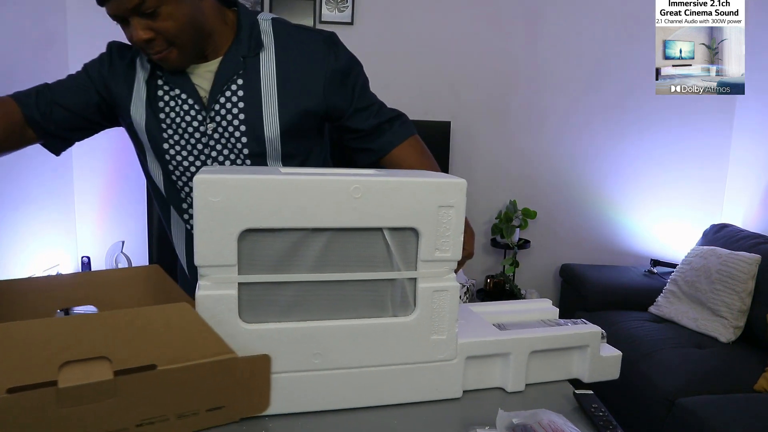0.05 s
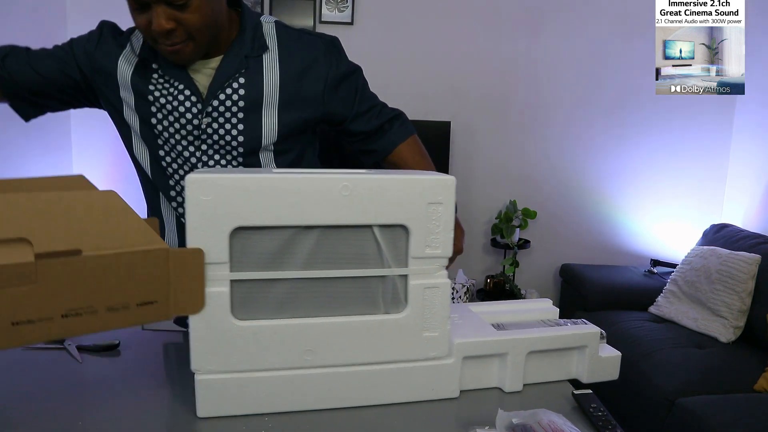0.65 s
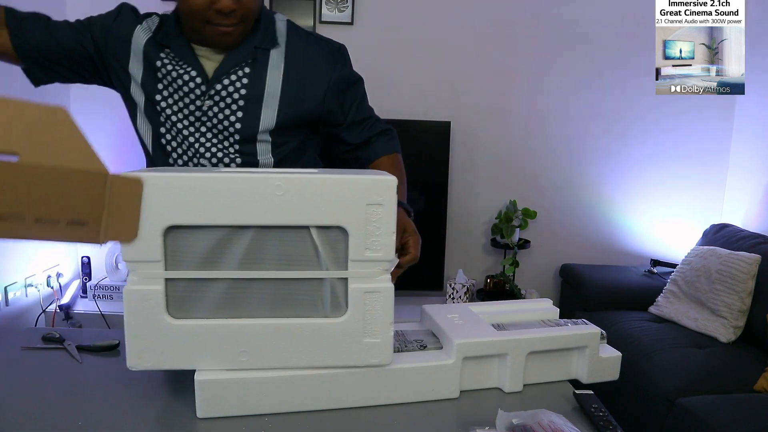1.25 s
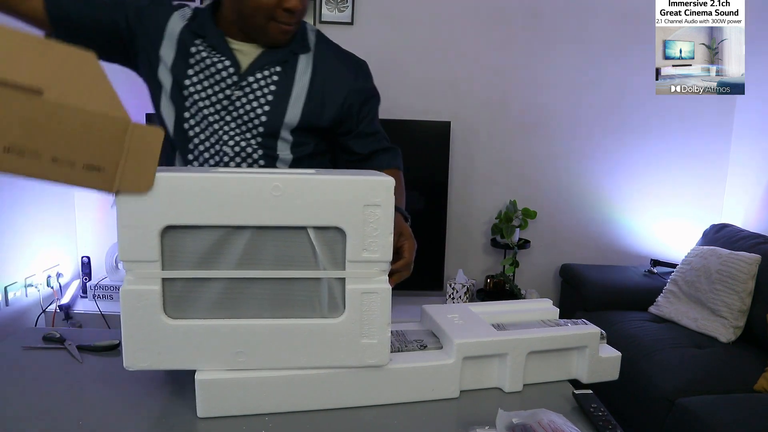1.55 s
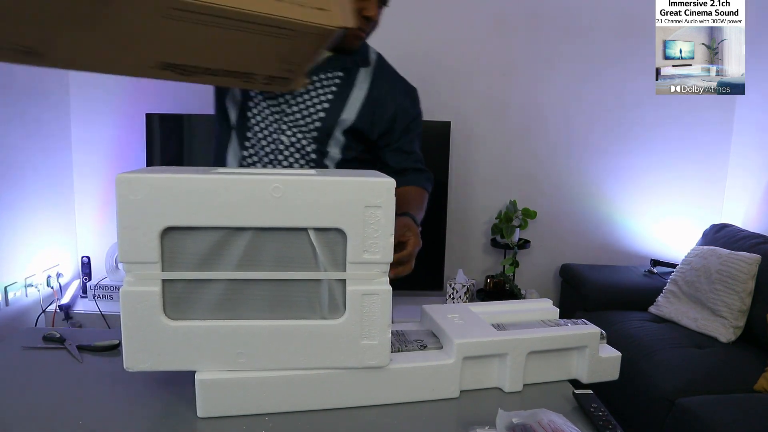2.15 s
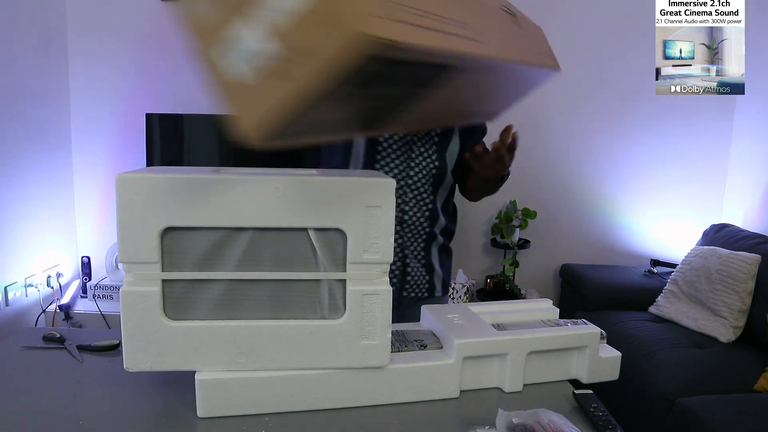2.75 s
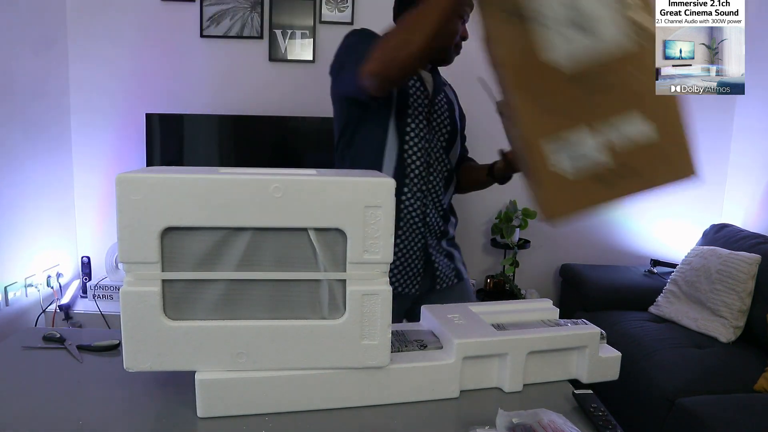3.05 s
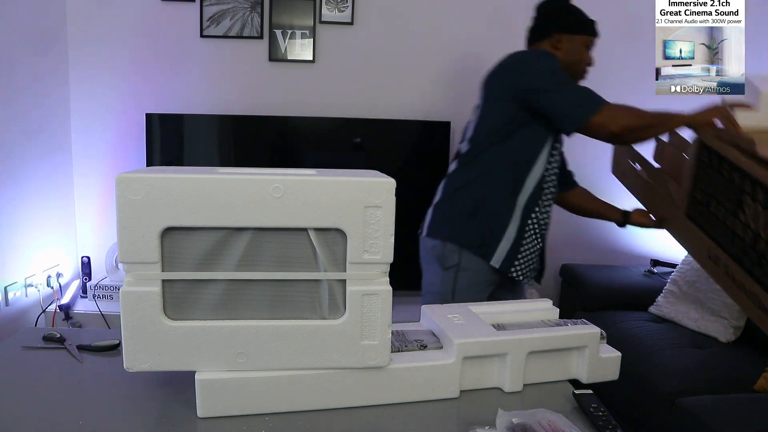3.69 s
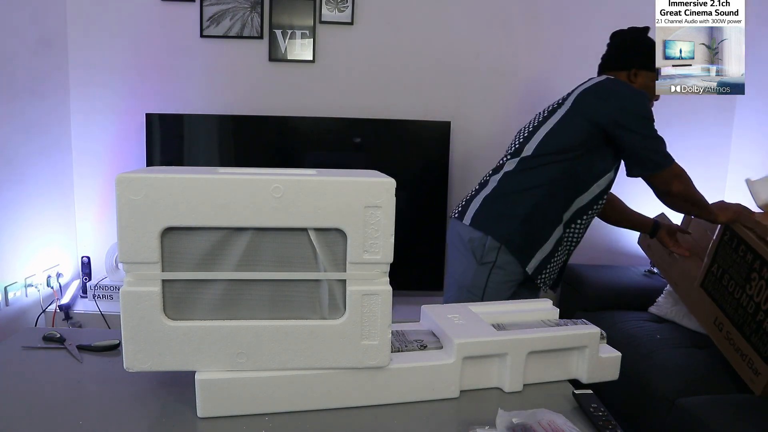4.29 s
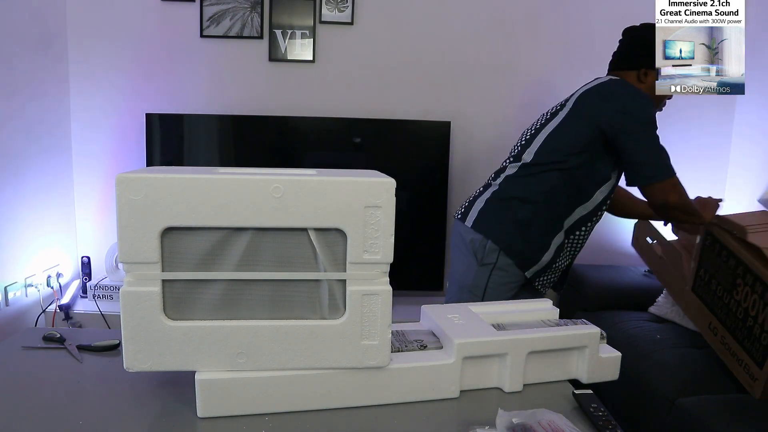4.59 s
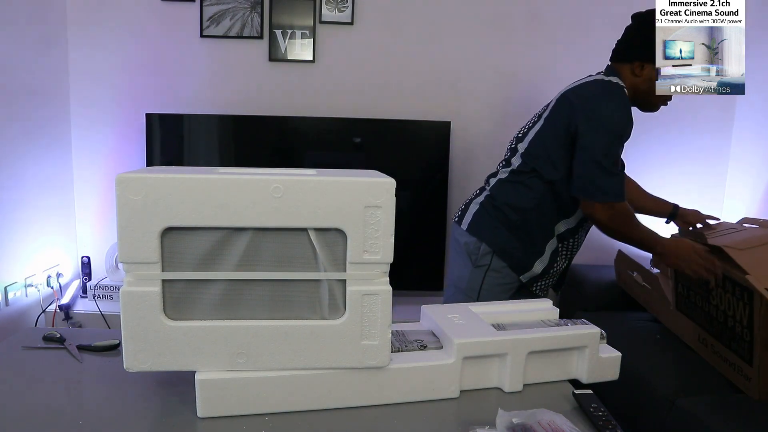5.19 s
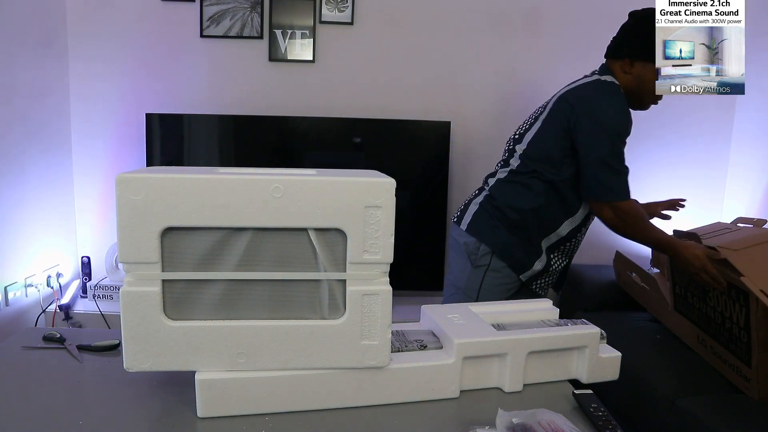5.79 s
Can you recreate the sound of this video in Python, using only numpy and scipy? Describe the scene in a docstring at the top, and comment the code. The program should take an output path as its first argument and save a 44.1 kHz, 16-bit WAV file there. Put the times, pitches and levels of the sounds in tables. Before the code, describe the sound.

A hollow cardboard carton scrapes and squawks over foam, then thuds and clacks as it is carried and set down in a small room.

```python
"""In a small room, a big cardboard carton is dragged off foam blocks, swung overhead and dropped on a sofa.
The card rasps over the foam, and sticks and slips to make a squawk and a low drone.
Blows make the hollow carton thud and boom, its flaps clack and scuff, and creases crack.
Some blows set a stiff panel ringing. Hands and sleeves rustle as it travels from left to right."""
import sys
import numpy as np
from scipy import signal
from scipy.fft import rfft, irfft, next_fast_len
from scipy.io import wavfile
from scipy.ndimage import uniform_filter1d

SR = 44100
rng = np.random.default_rng(int(sys.argv[2]) if len(sys.argv) > 2 else 0)


def master_out(mix):
    """Clip the mix to full scale and print it as 16-bit PCM to the path in sys.argv[1]."""
    frames = np.transpose(np.atleast_2d(mix))
    ceiling = np.clip(frames, -1, 1)
    pcm = np.round(ceiling * 32767).astype(np.int16)
    wavfile.write(sys.argv[1], SR, pcm)


N = 261954
FFT_SIZE = next_fast_len(N + SR // 5)
TIME, FREQS = np.arange(N) / SR, np.fft.rfftfreq(FFT_SIZE, 1 / SR)
EVENT_TIME = np.arange(SR // 2) / SR  # the half second that one short sound gets

# Blows on the carton. Each row: start in seconds, thud level in dB, pitch in Hz, clack level in dB,
# fade time in seconds, then dent and air boom in dB added to the thud level.
# A fade time (t60) is how long a sound takes to drop 60 dB. Table levels are relative: the code trims them.
BLOWS = [(0.076, -26.5, 607, -32, 0.17, 0, -33), (0.26, -27, 248, -41, 0.16, -4, -39),
         (0.357, -23, 241, -34, 0.18, 1, -37), (0.399, -16.5, 306, -15, 0.16, -3, -28.5),
         (0.498, -30.5, 529, -29, 0.16, -6, -31), (0.553, -23.5, 385, -29, 0.18, 3, -31),
         (0.629, -39, 467, -29.5, 0.14, -13, -32), (0.797, -31, 443, -31, 0.44, -4, -28),
         (1.21, -30, 296, -24, 0.11, -13, -13), (1.403, -30, 260, -32, 0.17, -2, -20),
         (1.427, -23.5, 780, -20, 0.15, -22, -19), (2.045, -24, 176, -45, 0.42, -1, -22),
         (2.367, -23, 380, -20.5, 0.27, -3, -35), (2.91, -15, 217, -22.5, 0.47, -4.5, -24),
         (3.279, -32.5, 400, -39, 0.18, -1, -11.5), (3.412, -31, 294, -39.5, 0.55, -4, -16.5),
         (3.55, -30.5, 318, -38.5, 0.68, 0, -25), (3.805, -10.5, 288, -17, 0.61, 2.5, -20),
         (3.928, -10.5, 423, -21, 0.31, 5, -7.5), (3.947, -16.5, 256, -22.5, 0.41, 6, -32),
         (3.984, -20, 480, -21, 0.091, 2, -17), (4.002, -22, 300, -17.5, 0.34, 10, -32),
         (4.205, -31, 337, -49, 0.32, -14, -17), (4.377, -23, 285, -19, 0.46, 3.5, -17.5),
         (4.509, -31.5, 465, -46, 0.35, -1, -13.5), (4.625, -40, 122, -42.5, 0.26, -15, -1.5),
         (4.821, -26, 253, -48, 1, 1.5, -10.5), (4.875, -24, 785, -20.5, 0.15, -3, -28),
         (4.893, -10.5, 334, -23, 0.36, 5.5, -34), (4.912, -12, 345, -40, 0.082, -3, -4),
         (5.443, -32.5, 350, -42, 0.29, -14, -14)]
def blows():
    """Each blow dents a wall, booms the air inside and rings the walls. Returns tones and noises."""
    tones = np.zeros(N)
    for start, db, hz, _, t60, dent_db, boom_db in BLOWS:
        dent = ring([(hz, db + dent_db, 0.047 * t60)], rise=0.0075)
        boom = amp(db + boom_db) * air_boom(t60)
        add(tones, start, dent + boom + amp(db - 5) * walls(hz, t60))
    return tones + stiff_panel() + hollow_side(), flap_clacks() + thuds() + cracks()


# The notes of the carton's broad walls. Each row: pitch in Hz, level in dB.
WALL_NOTES = [(151, 10), (172, 6.5), (202, 7), (247, -0.5), (285, 3.5), (315, 0), (347, 1.5), (388, -5),
              (467, -6), (545, 1.5), (610, -14), (745, -19), (842, 12)]
def walls(pitch_hz, t60):
    """A blow rings the wall notes nearest its own pitch, each in a phase set by where it lands."""
    hz, db = np.transpose(WALL_NOTES)
    strength = amp(db - 20 * np.log2(hz / pitch_hz) ** 2)
    waves = np.sin(2 * np.pi * (hz[:, None] * EVENT_TIME + rng.random((len(hz), 1))))
    return burst(0.0023, t60) * (strength / np.linalg.norm(strength) @ waves)


# The notes of the air in the carton. Each row: pitch in Hz, level in dB.
AIR_NOTES = [(94.3, 6), (74.8, -8.5), (118.2, 0.5)]
def air_boom(t60):
    """The air inside booms, damped as much as the walls by what they rest on."""
    return ring([(hz, db, t60) for hz, db in AIR_NOTES], rise=0.016)


# The tone of a thud. Each row: frequency in Hz, level in dB.
THUD_TONE = [(60, -42), (130, -30), (200, 7), (320, 5.5), (480, 0.5), (700, -9), (1200, -34), (3000, -64)]
def thuds():
    """The contents thud at each blow: a burst of dull noise."""
    level = np.zeros(N)
    for start, db, _, _, t60, _, _ in BLOWS:
        add(level, start, amp(db - 14) * burst(0.0046, t60))
    return level * band(rng.standard_normal(N), amp(look_up(THUD_TONE, FREQS)))


# The tone of a clack. Each row: frequency in Hz, level in dB.
CLACK_TONE = [(240, -41), (400, 17), (550, 9), (690, 5), (949, -6.5), (1070, -1), (1740, -10),
              (2290, -11.5), (3190, -17), (10300, -34), (15000, -61)]
def flap_clacks():
    """Loose flaps clack at each blow and die away sooner than the walls, with a faint high tick."""
    clack, tick = np.zeros((2, N))
    rise = 0.0021
    for start, _, _, db, t60, _, _ in BLOWS:
        add(clack, start, amp(db - 4) * (burst(rise, 0.52 * t60) + 0.58 * burst(rise, 0.0067)))
        add(tick, start, amp(0.31 * db - 41) * burst(rise, 0.11))
    chatter = slips(per_s=25000, spread_db=0.98)
    card = amp(look_up(CLACK_TONE, FREQS) + 2 * ripple(spacing_hz=44.4))
    return clack * band(chatter, card * above(750) * below(3300)) + tick * band(chatter, card * above(2640))


def ripple(spacing_hz):
    """The card's many small resonances: random ups and downs over frequency, broader in the treble."""
    place = np.log1p(FREQS / 2000) * 2000 / spacing_hz
    return unit(np.interp(place, np.arange(2048), rng.standard_normal(2048)))


# The notes of a stiff panel. Each row: pitch in Hz, level in dB, fade time in seconds.
PANEL_NOTES = [(666, 4, 0.21), (690, -2, 0.082), (847, -2.5, 0.13), (985, -11, 0.27), (1045, -9.5, 0.28),
               (380, -11, 0.2), (1640, -17, 0.12), (2650, -15, 0.13)]
# The blows that ring it. Each row: start in seconds, level in dB.
PANEL_HITS = [(4.003, -12), (4.892, -25)]
def stiff_panel():
    """A stiff panel swells into a short ring."""
    return strike(PANEL_NOTES, PANEL_HITS, rise=0.014)


# The notes of a hollow side. Each row: pitch in Hz, level in dB, fade time in seconds.
HOLLOW_NOTES = [(323, -5, 0.12), (395, -6.5, 0.17), (603, -1, 0.16), (654, -6, 0.22), (724, 0, 0.081),
                (860, -1, 0.063), (1255, -13, 0.097), (1470, -9.5, 0.092)]
# The blows that ring it. Each row: start in seconds, level in dB.
HOLLOW_HITS = [(1.431, -29.5), (2.371, -19.5), (3.807, -30), (4.895, -22)]
def hollow_side():
    """A hollow side answers a quick blow with a sharp knock."""
    return strike(HOLLOW_NOTES, HOLLOW_HITS, rise=0.0018)


# Creases that crack. Each row: start in seconds, level in dB, centre in Hz, fade time in seconds.
CREASES = [(0.399, -35, 1400, 0.044), (0.5545, -22, 500, 0.014), (1.2095, -22, 1600, 0.015),
           (1.433, -22.5, 1400, 0.035), (1.658, -27, 2500, 0.025), (2.21, -44, 4500, 0.013),
           (2.368, -24, 2030, 0.026), (2.9085, -28, 1000, 0.035), (3.19, -41, 3770, 0.027),
           (3.4125, -37, 1500, 0.038), (3.5505, -38.5, 1500, 0.026), (3.808, -25.5, 3650, 0.022),
           (4.005, -16, 1470, 0.062), (4.224, -48, 5460, 0.016), (4.382, -38, 4520, 0.025),
           (4.758, -37, 1800, 0.066), (4.886, -32, 5080, 0.04), (4.897, -35, 5500, 0.033)]
def cracks():
    """A crease gives way under a blow or a finger: fibres break, from a dull pop to a bright snap."""
    out = np.zeros(N)
    for start, db, hz, t60 in CREASES:
        octaves_away = np.log2((FREQS + 1) / hz)
        tone = np.exp(-.5 * (octaves_away / 0.78) ** 2) * below(13000, order=16)
        fibres = band(rng.standard_normal(N), tone)[:len(EVENT_TIME)]
        add(out, start, amp(db) * burst(0.00043, t60) * fibres)
    return out


# The pull off the foam. Each row: time in seconds, rasp level in dB, hiss in dB added to the rasp.
PULL = [(0.0, -29.5, -6), (0.2, -27.5, -5), (0.239, -17.5, -14.5), (0.267, -24.5, -10), (0.289, -16, -11.5),
        (0.339, -18.5, -13), (0.385, -28.5, -3), (0.46, -38.5, -0.5), (0.53, -32.5, -10), (0.6, -36, -8.5),
        (0.77, -30.5, -8), (1.05, -30.5, -4.5), (1.17, -33, -8.5), (1.26, -31.5, -7), (1.32, -31.5, -6),
        (1.385, -32.5, -5.5), (1.425, -30, -4.5), (1.47, -30.5, -6.5), (1.73, -31.5, -4),
        (1.89, -47.5, -13), (2.021, -48.5, -15)]
# Where the carton binds. Each row: start and length in seconds, hollow body in dB added to the rasp.
SNAGS = [(0.0, 0.19, -2.5), (0.243, 0.058, -2.5), (0.399, 0.057, 8.5), (1.24, 0.24, -6), (1.69, 0.3, 1)]
# The tone of card on foam. Each row: frequency in Hz, level in dB.
PULL_TONE = [(35, -52), (60, -18), (123, -22.5), (269, -6.5), (539, -9.5), (648, -7), (727, -6.5),
             (1030, -9), (1150, -11), (1830, -6.5), (2840, -8.5), (4950, -22), (9900, -27.5),
             (11900, -30.5), (15000, -61)]
def dragging():
    """Card rasps over foam until it lifts clear; the walls resound more where it binds."""
    times, db, hiss_db = np.transpose(PULL)
    rasp = amp(np.interp(TIME, times, db)) * np.clip((times[-1] - TIME) / 0.012 + 1, 0, 1)
    snag_power = sum((amp(body_db) * stroke(start, length, rise=0.016, t60=0.11)) ** 2
                     for start, length, body_db in SNAGS)
    body = rasp * np.sqrt(amp(-5.5) ** 2 + snag_power)
    hiss = rasp * amp(np.interp(TIME, times, hiss_db))
    return rub((rasp, body, hiss), PULL_TONE, slips(30000, 0.94), flutter_db=0.37, taut=0.24,
               rumble_db=-44, rumble_follow=0.16, rumble_hz=28, body_db=-6, rasp_db=-3, hiss_db=0.5)


# Resonances of rubbed card. Each row: centre in Hz, width in Hz, boost in dB when fully taut.
CARD_PEAKS = [(658, 11, 10.5), (960, 47, -2), (1480, 81, 3), (1920, 250, 3.5), (2720, 14, -5),
              (3160, 59, 4)]
def rub(levels, tone, grains, flutter_db, taut, rumble_db, rumble_follow, rumble_hz,
        body_db, rasp_db, hiss_db):
    """Slips under an uneven grip make a rumble, hollow body, rasp and hiss; taut card rings more."""
    rasp, body, hiss = levels
    drive = grains * amp(flutter_db * wander(90))
    peaks = sum(db / (1 + (2 * (FREQS - hz) / width) ** 2) for hz, width, db in CARD_PEAKS)
    card = amp(look_up(tone, FREQS) + taut * peaks)
    return (amp(rumble_db) * rasp ** rumble_follow * band(drive, above(rumble_hz) * below(223))
            + amp(body_db) * body * band(drive, card * above(232) * below(1190))
            + amp(rasp_db) * rasp * band(drive, card * above(1090) * below(3700))
            + amp(hiss_db) * hiss * band(drive, card * above(4610)))


# The squawk of the card. Each row: time in seconds, level in dB, pitch in Hz.
SQUAWK_PATH = [(0.235, -37, 643), (0.268, -19, 677), (0.277, -22, 699), (0.286, -11.5, 636),
               (0.303, -21, 667), (0.314, -11, 657), (0.327, -11, 656), (0.346, -19, 689),
               (0.366, -15.5, 672), (0.38, -24, 620), (0.428, -27.5, 744), (0.45, -30, 696)]
# Its low drone. Each row: time in seconds, level in dB, pitch in Hz.
DRONE_PATH = [(2.93, -28, 156.5), (2.97, -17.5, 151.7), (3.014, -26, 153.4), (3.098, -16.5, 154),
              (3.142, -25.5, 150.3), (3.22, -52, 146.8)]
def squawk_and_drone():
    """The card sticks and slips: fast for the squawk, and later slowly for the drone."""
    return (judder(SQUAWK_PATH, level_db=-5, jitter=0.023, shimmer_db=3.5, overtone_db=-11.5, slope_db=-5),
            judder(DRONE_PATH, level_db=-7.5, jitter=0.03, shimmer_db=1, overtone_db=-15, slope_db=-4))


def judder(path, level_db, jitter, shimmer_db, overtone_db, slope_db):
    """An edge sticks and slips in step with a panel: a wavering tone with weak overtones."""
    times, db, hz = np.transpose(path)
    cycles = np.cumsum(np.interp(TIME, times, hz) * (1 + jitter * wander(87))) / SR
    tone = np.sin(2 * np.pi * cycles)
    for k in range(2, 6):
        tone += amp(overtone_db + slope_db * (k - 2)) * np.sin(2 * np.pi * (k * cycles + rng.random()))
    gate = np.clip(np.minimum(TIME - times[0], times[-1] - TIME) / 0.02 + 1, 0, 1)
    return gate * amp(np.interp(TIME, times, db) + level_db + shimmer_db * wander(130)) * unit(tone)


def puffs(friction, tone, depth):
    """While the edge judders, its friction comes in puffs, one to each slip."""
    swing = signal.hilbert(tone, FFT_SIZE)[:N]
    return friction * (1 + depth * swing.real / (abs(swing) + .02))


# The singing gap. Each row: time in seconds, centre in Hz, level in dB added to the pull's rasp.
GAP_PATH = [(0.0, 2120, -14), (0.58, 1930, -6), (0.76, 1750, -1), (0.9, 1880, -12), (1.05, 1880, -8.5),
            (1.36, 1480, -12.5), (1.44, 1200, -11), (1.52, 1310, 1.5), (1.6, 1450, -1.5),
            (1.645, 1770, 1.5), (1.71, 1810, 1), (1.83, 1830, -25)]
def singing_gap():
    """Friction noise resonates in the gap between card and foam, in a band that moves with the edge."""
    times, hz, db = np.transpose(GAP_PATH)
    pull_times, rasp_db, _ = np.transpose(PULL)
    level_db = np.interp(TIME, pull_times, rasp_db, right=-120) + np.interp(TIME, times, db) + 0.5
    return amp(level_db) * tuned_noise(np.interp(TIME, times, hz), width_hz=730)


# Scuffs of the flaps. Each row: start in seconds, rasp in dB, hiss in dB, fade time in seconds.
FLAP_SCUFFS = [(0.23, -34, -28, 0.08), (0.655, -46, -32.5, 0.19), (1.404, -20.5, -37, 0.35),
               (1.709, -22, -29, 0.49), (2.078, -25, -39.5, 0.14), (2.212, -30.5, -36.5, 0.13),
               (2.342, -25, -49, 0.37), (2.362, -14.5, -56, 0.063), (2.615, -47, -57, 0.17),
               (2.703, -45, -60, 0.52), (2.81, -42, -59, 0.42), (2.959, -29.5, -42, 0.22),
               (3.05, -29, -49, 0.15), (3.185, -35.5, -48, 0.4), (3.582, -35.5, -64, 0.097),
               (3.721, -29, -44, 0.12), (3.804, -16.5, -35, 0.083), (3.891, -24, -53, 0.17),
               (3.986, -22, -34, 0.076), (4.223, -30, -37.5, 0.077), (4.469, -32.5, -46, 0.17),
               (4.864, -19.5, -43, 0.18), (4.871, -25.5, -37.5, 0.15), (4.9944, -33.5, -41.5, 0.91),
               (5.84, -47.5, -65, 0.44)]
# The tone of brushed card, here and in carrying(). Each row: frequency in Hz, level in dB.
BRUSH_TONE = [(35, -35), (60, 46.5), (102, 6), (170, -2.5), (317, -6), (564, -6.5), (855, -9.5),
              (1180, -13.5), (2710, -7.5), (2980, -10.5), (11100, -28), (12800, -39), (15000, -68)]
def scuffs():
    """A flap catches and lets go: a small snap, then a quick swell of friction."""
    rasp, hiss = np.zeros((2, N))
    snap = 0.7 * burst(0.00065, 0.0092)
    for start, rasp_db, hiss_db, t60 in FLAP_SCUFFS:
        add(rasp, start, amp(rasp_db - 6) * burst(0.0039, t60))
        add(hiss, start, amp(hiss_db - 2) * (burst(0.0067, t60) + snap))
    grains, card = slips(12000, 0.82), amp(look_up(BRUSH_TONE, FREQS))
    return rasp * band(grains, card * above(770) * below(2360)) + hiss * band(grains, card * above(3360))


# Strokes over the carton. Each row: start and length in seconds, rasp level in dB,
# then hollow body and hiss in dB added to the rasp.
STROKES = [(2.047, 0.16, -38.5, 7, -13.5), (2.231, 0.048, -38, -5, -6), (2.267, 0.1, -42, 17, 0.5),
           (2.579, 0.047, -40, 6.5, -12), (2.842, 0.076, -38, 2, -9), (2.91, 0.2, -38.5, 10, -10),
           (3.12, 0.35, -50.5, 17.5, -1.5), (3.41, 0.11, -52.5, 22.5, -2.5),
           (3.55, 0.19, -47.5, 13.5, -9.5), (3.711, 0.35, -31.5, 1, -2.5), (4.016, 0.15, -39.5, 12.5, -3),
           (4.18, 0.046, -29.5, 3.5, -14), (4.35, 0.15, -40, 12, -5.5), (4.612, 0.036, -35.5, -21, -5),
           (4.807, 0.21, -40.5, 16.5, -0.5), (5.094, 0.086, -41.5, -17, -8.5), (5.245, 0.17, -46.5, -32, 0),
           (5.445, 0.072, -43, 1, -3), (5.631, 0.089, -48, -13, -8)]
def carrying():
    """Flaps, hands and sofa brush the carton, each stroke sagging as it slows, over a faint rustle."""
    picked_up, set_down, rise = 1.8, 5.1, 0.043  # seconds
    grip = np.clip((TIME - picked_up) / rise, 0, 1) * amp(-51.5 - 6 * np.maximum(TIME - set_down, 0))
    power = np.outer(amp([0, 9, -8.5]), grip) ** 2  # rasp, body and hiss of hands and sleeves
    for start, length, db, body_db, hiss_db in STROKES:
        swell = stroke(start, length, rise, t60=0.36, sag_db_per_s=7.5)
        power += np.outer(amp([db, db + body_db, db + hiss_db]), swell) ** 2
    return rub(np.sqrt(power), BRUSH_TONE, slips(22000, 2.3), flutter_db=-1, taut=0.91, rumble_db=-36.5,
               rumble_follow=0.46, rumble_hz=73.6, body_db=-13.5, rasp_db=-4.5, hiss_db=-5.5)


# Bands of rubbing noise: narrow faint rings and one broad swell of hiss.
# Each row: start and length in seconds, level in dB, centre in Hz, width in Hz.
RUB_BANDS = [(0.64, 0.43, -40, 1873, 110), (0.794, 0.32, -37, 3470, 2200), (5.05, 0.23, -59, 873, 40),
             (5.081, 0.28, -57.5, 2010, 150), (5.12, 0.22, -59, 1600, 130), (5.46, 0.3, -61, 1726, 60)]
def card_rings():
    """Rubbed card rings faintly, during the drag and as the flaps settle on the sofa."""
    return sum(amp(db) * stroke(start, length, rise=0.071, t60=0.2) * tuned_noise(np.full(N, hz), width)
               for start, length, db, hz, width in RUB_BANDS)


def shifting_touch(friction, depth_db):
    """A changing touch favours other resonances: random patches about 250 Hz wide and 0.1 s long."""
    spectrum = signal.stft(friction, nperseg=512)[2]
    patches = uniform_filter1d(rng.standard_normal(spectrum.shape), size=3, axis=0)
    patches = unit(uniform_filter1d(patches, size=18, axis=1))
    return np.std(friction) * unit(signal.istft(spectrum * amp(depth_db * patches), nperseg=512)[1][:N])


# How long the room rings. Each row: frequency in Hz, fade time in seconds.
ROOM_FADE = [(150, 0.51), (600, 0.3), (2500, 0.22), (10000, 0.16)]
def room_echo(sound, level_db):
    """The small room sends back scattered reflections, the treble dying first."""
    count = len(EVENT_TIME)
    taps = rng.standard_normal(count) * (rng.random(count) < 3000 / SR) * (EVENT_TIME > .003)
    hz, t, spectrum = signal.stft(taps, nperseg=256, fs=SR)
    fade = np.exp(-np.log(1000) * t / look_up(ROOM_FADE, hz)[:, None])
    tail = signal.istft(spectrum * fade, nperseg=256)[1]
    return amp(level_db) * signal.fftconvolve(sound, tail / np.linalg.norm(tail))[:N]


# Stereo width. Each row: frequency in Hz, gain in dB of the left-right difference.
STEREO_WIDTH = [(100, -59), (250, -32), (600, -21.5), (1400, -17.5), (2800, -11), (4200, -1.5),
                (6000, -0.5), (9000, 3.5), (12000, 4), (14000, 18.5)]
def stereo_side(mid, reflected):
    """Sound from one side reaches that ear first; reflections arrive in ever-changing phase."""
    leftness = np.interp(TIME, [1.8, 3.6], [.22, -.45])
    direct = leftness * filtered(mid, 1j)  # 1j shifts each wave by a quarter of a cycle
    spectrum = signal.stft(reflected, nperseg=256)[2]
    scattered = signal.istft(spectrum * np.exp(2j * np.pi * rng.random(spectrum.shape)), nperseg=256)[1]
    return filtered(direct + unit(scattered[:N]) * np.std(reflected), amp(look_up(STEREO_WIDTH, FREQS)))


# The tone of the room at rest. Each row: frequency in Hz, level in dB.
HUSH_TONE = [(20, 0), (70, 0.5), (200, -10), (430, -20), (1200, -10.5), (2500, -22), (9600, -25.5),
             (12000, -60), (15000, -66)]
# Its stereo width. Each row: frequency in Hz, gain in dB of the left-right difference.
HUSH_WIDTH = [(60, -5), (110, 3), (200, 8), (380, 20), (690, 14), (1280, 7), (2360, 13), (4350, 8),
              (8030, 3), (14800, 7)]
def room_hush():
    """The faint, steady noise of the room. Returns its mid and side parts."""
    mid, side = amp(-60) * band(rng.standard_normal((2, N)), amp(look_up(HUSH_TONE, FREQS)))
    return mid, filtered(side, amp(look_up(HUSH_WIDTH, FREQS)))


def amp(db):
    """Turns decibels into a gain."""
    return 10 ** (np.asarray(db) / 20)


def unit(x):
    """Scales x to an average (rms) level of 1."""
    return x / np.sqrt(np.mean(x ** 2) + 1e-20)


def look_up(table, hz):
    """Reads between the rows of a frequency table."""
    row_hz, value = np.transpose(table)
    return np.interp(np.log(hz + 1), np.log(row_hz + 1), value)


def add(mix, start, sound):
    """Mixes a sound in at start seconds."""
    part = mix[round(start * SR):][:len(sound)]
    part += sound[:len(part)]


def filtered(x, gain):
    """Filters x with one gain for each of FREQS."""
    return irfft(rfft(x, FFT_SIZE) * gain, FFT_SIZE)[..., :N]


def band(x, gain):
    """Filters x, then sets its level to 1."""
    return unit(filtered(x, gain))


def below(hz, order=8):
    """Gains that keep what lies below hz."""
    return 1 / np.sqrt(1 + (FREQS / hz) ** order)


def above(hz):
    """Gains that keep what lies above hz."""
    return np.sqrt(1 - below(hz) ** 2)


def wander(hz):
    """A random wobble, mostly slower than hz."""
    return band(rng.standard_normal(N), below(hz, order=4))


def slips(per_s, spread_db):
    """Tiny slips of random sign and size."""
    size = amp(spread_db * np.minimum(rng.exponential(1, N), 5))
    return unit(size * rng.standard_normal(N) * (rng.random(N) < per_s / SR))


def tuned_noise(hz, width_hz):
    """Noise through a resonance that follows the curve hz."""
    turn, r = np.exp(2j * np.pi * np.cumsum(hz) / SR), np.exp(-np.pi * width_hz / SR)
    narrow = signal.lfilter([(1 - r) ** 2], [1, -2 * r, r * r], rng.standard_normal(N) / turn)
    return unit((turn * narrow).real)


def burst(rise, t60):
    """Swells for rise seconds, then fades over t60 seconds (0.01 at least)."""
    fade = np.exp(-np.log(1000) * np.maximum(EVENT_TIME - rise, 0) / max(t60, .01))
    return np.minimum(EVENT_TIME / rise, 1) * fade


def stroke(start, length, rise, t60, sag_db_per_s=0):
    """The level of a movement that swells, holds and dies away."""
    t = np.maximum(TIME - start, 0)
    fade = np.exp(-np.log(1000) * np.maximum(t - length, 0) / t60)
    return np.minimum(t / rise, 1) * amp(-sag_db_per_s * t) * fade


def ring(notes, rise):
    """Notes that build up while a blow is in contact, then fade."""
    return sum(amp(db) * burst(rise, t60) * np.sin(2 * np.pi * hz * EVENT_TIME) for hz, db, t60 in notes)


def strike(notes, hits, rise):
    """Rings the same notes at every hit."""
    out = np.zeros(N)
    for start, db in hits:
        add(out, start, amp(db) * ring(notes, rise))
    return out


def scene():
    """The carton passes close by from left to right."""
    tones, clatter = blows()
    slide, brush = dragging(), carrying()
    squawk, drone = squawk_and_drone()
    friction = puffs(slide, squawk, depth=0.37) + singing_gap() + card_rings() + brush + scuffs()
    friction = shifting_touch(friction, depth_db=1.8)
    echo = room_echo(friction + clatter, level_db=-9.5)
    mid = friction + clatter + tones + squawk + drone + echo  # what left and right share
    side = stereo_side(mid, reflected=0.96 * friction + 0.94 * clatter + 0.87 * tones + 1.54 * echo)
    hush_mid, hush_side = room_hush()
    mid, side = mid + hush_mid, side + hush_side
    return np.array([mid + side, mid - side])


def record(dry):
    """Rounds off the highest peaks, then cuts the treble above 15200 Hz."""
    rounded = dry / (1 + (dry / .88) ** 8) ** (1 / 8)
    low_pass = signal.firwin(401, 15200, window=("kaiser", 9), fs=SR)
    return signal.oaconvolve(rounded, low_pass[None], "same")


dry = scene()
out = record(dry)
master_out(out)
```